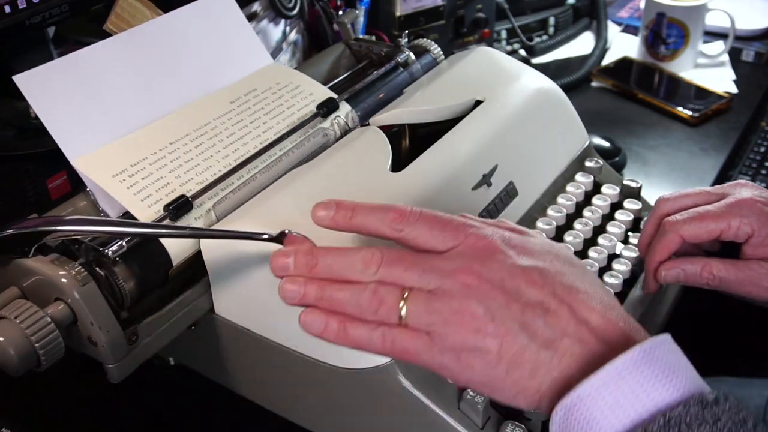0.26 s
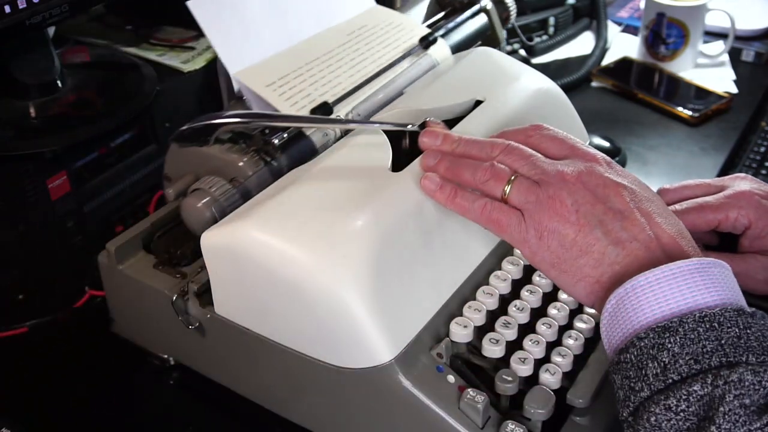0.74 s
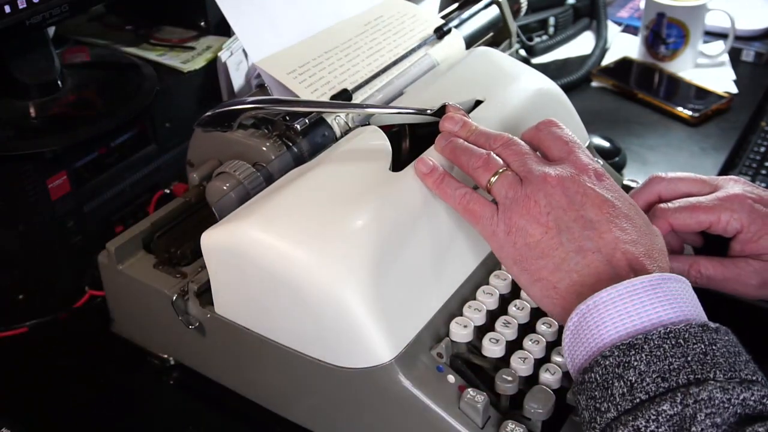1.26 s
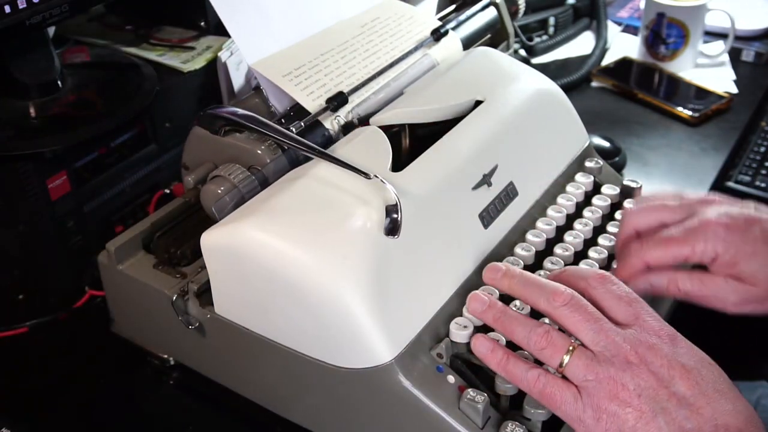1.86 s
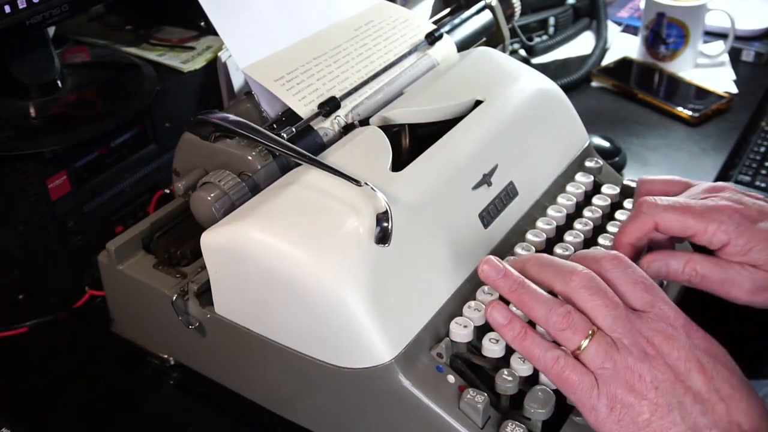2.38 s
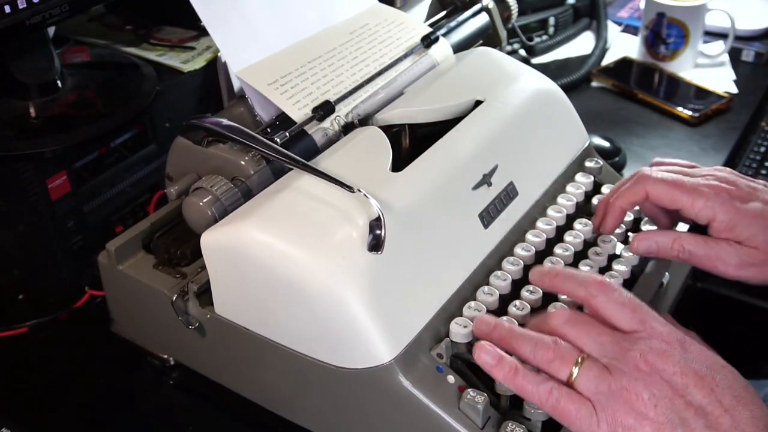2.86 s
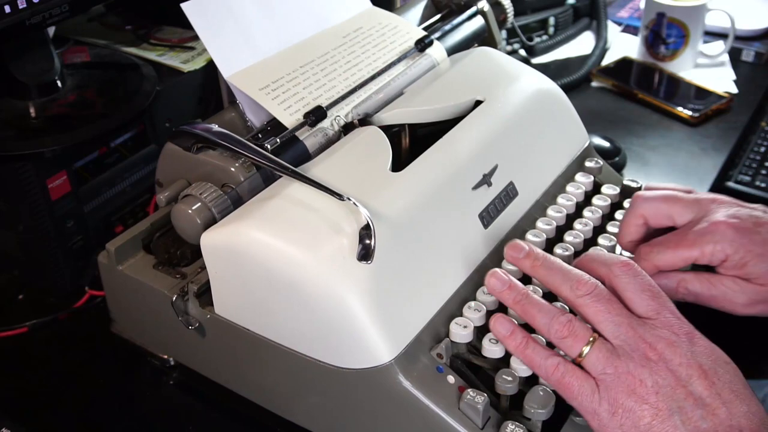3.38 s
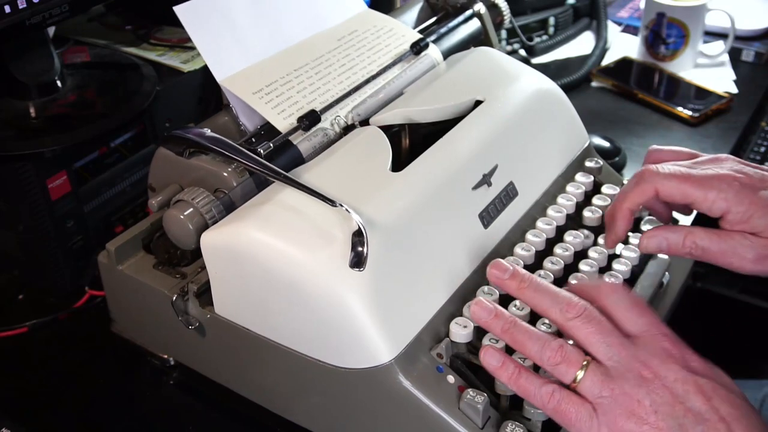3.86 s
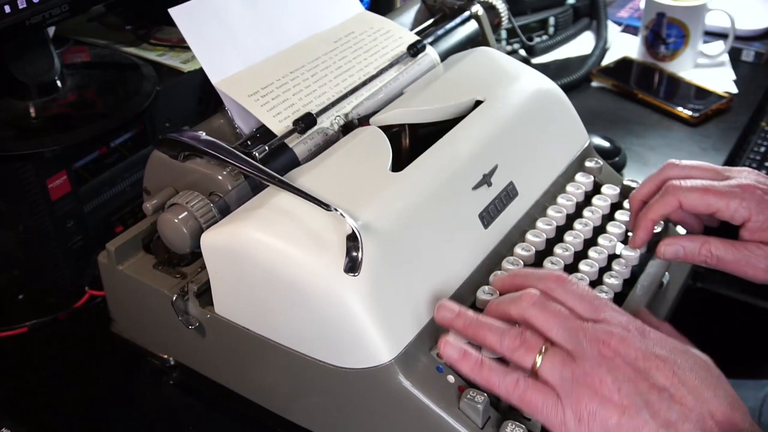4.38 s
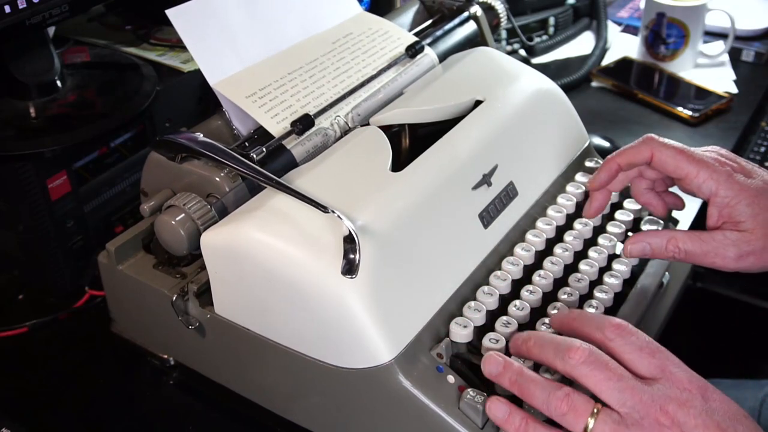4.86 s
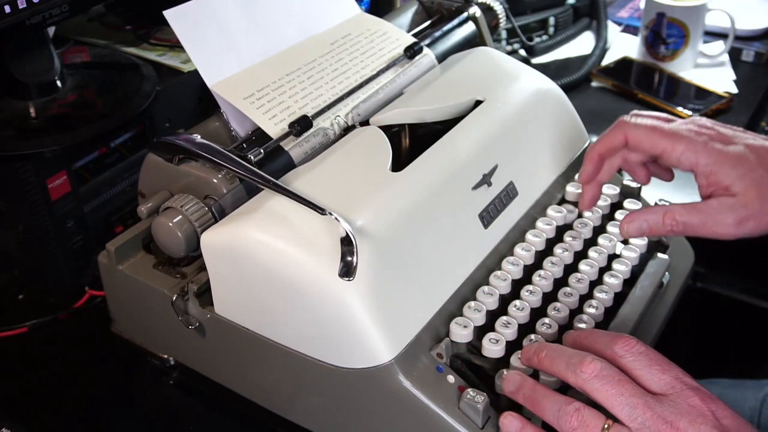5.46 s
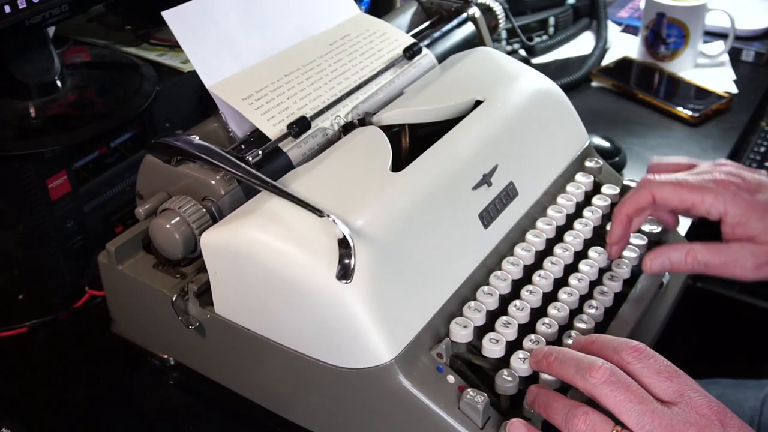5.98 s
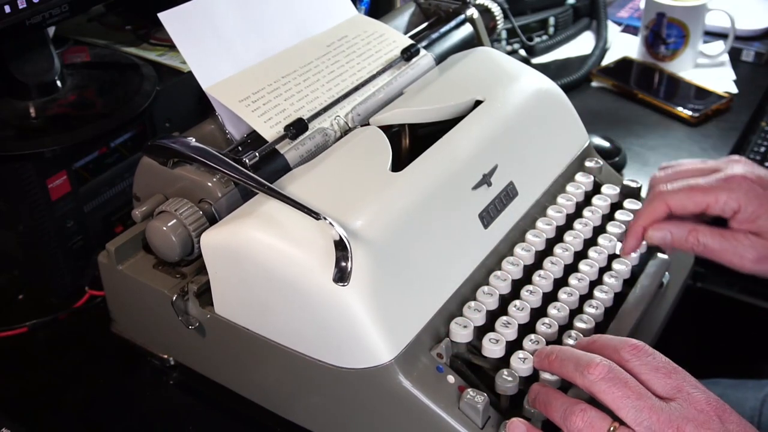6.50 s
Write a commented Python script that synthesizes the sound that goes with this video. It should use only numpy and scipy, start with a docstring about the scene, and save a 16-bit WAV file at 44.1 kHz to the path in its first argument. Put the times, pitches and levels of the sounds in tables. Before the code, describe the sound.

Close, sharp metallic keystrokes and space bar clacks on a manual typewriter follow a rattling carriage return in a small room.

```python
"""Typing on a manual typewriter

Close by in a small room, the carriage is pushed back, then a line is typed. Each letter is a chain of
metal contacts: the key goes down, the escapement (the catch that steps the carriage) trips, the slug
(the metal letter) cracks on the platen (the roller) and its typebar drops back. The blows rattle the
basket of typebars, fingers thump the desk, and a faint hum lies underneath."""
import sys
import numpy as np
from scipy import signal
from scipy.fft import rfft, irfft, next_fast_len
from scipy.io import wavfile

SR = 44100
rng = np.random.default_rng(int(sys.argv[2]) if len(sys.argv) > 2 else 0)


def to_wav(s):
    """Save 16-bit WAV."""
    ch = np.atleast_2d(s).T  # columns
    pcm = np.round(np.clip(ch, -1, 1) * 32767)  # PCM
    wavfile.write(sys.argv[1], SR, pcm.astype(np.int16))


N = 296793
TIME = np.arange(N) / SR

# Levels in the tables are relative. A ring time (t60) is how long a sound takes to fade by 60 dB.
# typed letters: (strike time [s], crack [dB], key travel before it [s], finger push [dB], way back [s])
KEYSTROKES = [(1.5884, -15.5, .041, -27.5, 0.057), (1.815, -13.5, .037, -23, 0.05),
              (2.0854, -12, 0.037, -20.5, 0.059), (2.226, -12.5, 0.043, -32, 0.052),
              (2.4182, -13.5, 0.044, -24.5, 0.053), (2.6865, -13.5, 0.04, -26, 0.044),
              (2.7983, -13.5, 0.012, -47, 0.045), (2.9521, -13, 0.028, -30.5, 0.051),
              (3.064, -15, .014, -35, 0.046), (3.2653, -14, .037, -25.5, 0.056),
              (3.396, -13.5, 0.019, -33, 0.051), (3.6842, -14, .041, -22.5, .051),
              (3.8474, -13.5, .028, -26, 0.046), (4.311, -14, 0.03, -31, 0.048),
              (5.297, -18.5, .031, -33, 0.057), (5.8768, -17.5, .036, -25.5, .052),
              (6.1276, -15, 0.033, -30, 0.05)]
# the space bar or a released key unlatches, then lands: (time [s], latch [dB], landing [dB])
KEY_CLACKS = [(1.741, -32, -39), (1.941, -31, -40.5), (1.965, -36, -33), (2.508, -52, -31),
              (2.54, -30, -33), (2.619, -33, -29.5), (3.205, -31.5, -42), (3.468, -33, -32.5),
              (3.543, -29, -30), (3.98, -32, -30.5), (3.996, -29.5, -36.5), (4.091, -45, -28.5),
              (4.112, -36.5, -46), (4.27, -37.5, -46.5), (4.47, -32.5, -35.5), (4.522, -60, -41.5),
              (5.424, -33.5, -40), (6.016, -30.5, -35.5), (6.258, -31.5, -37.5)]
# fingertips touch the keys: (time [s], level [dB])
FINGER_TOUCHES = [(4.64, -66), (5.584, -63), (5.644, -56.5), (5.741, -61.5), (5.762, -58.5), (6.471, -51.5),
                  (6.486, -65), (6.637, -67.5)]
# return lever, ratchet and margin stop; more weight, more knock: (time [s], level [dB], weight [dB])
LEVER_HITS = [(.009, -40.5, 3), (0.054, -36, -3), (0.09, -31.5, -4), (.102, -27.5, -4), (.126, -29.5, -3),
              (.139, -26.5, -16), (.151, -26, -3.5), (.182, -31.5, -4.5), (.274, -31, -2),
              (0.3187, -25.5, -13), (0.898, -44, 2.5), (.991, -42.5, -1.5), (1.082, -30.5, 4.5),
              (1.117, -40.5, 0.5), (1.224, -44.5, 3.5), (1.261, -32, 6.5), (1.272, -22.5, 0),
              (1.29, -27.5, -0.5), (1.304, -33.5, -8), (1.371, -34.5, -0.5), (1.403, -38.5, -5)]
# a hand shoves the machine into the desk: (time [s], level [dB])
HAND_SHOVES = [(.164, -45.5), (1.106, -45), (1.151, -41.5), (1.29, -46), (4.159, -41)]

# the tone colour of each sound: (frequency [Hz], level [dB])
KNOCK_COLOUR = [(100, -7.5), (190, -6.5), (300, -2), (440, 0.5), (560, -4), (900, -1.5), (1500, 0),
                (1900, 3), (2800, -19), (6000, -44.5)]  # heavy frame
CLICK_COLOUR = [(600, -42), (1400, -18.5), (2300, 6.5), (3300, 1.5), (4800, 3), (5800, 2), (6600, -3),
                (8000, -6), (11000, -19.5)]  # levers
TICK_COLOUR = [(4000, -52), (7000, -3), (8500, -2.5), (10000, -2), (11000, -5.5), (15500, -3.5)]  # smallest parts
CRACK_COLOUR = [(300, -46), (1200, -7.5), (2200, 8), (3200, 1.5), (4800, 6), (6500, 2), (8000, 1.5),
                (10000, -5.5), (14000, -18.5)]  # slug on the roller
CHATTER_COLOUR = [(300,-18.5), (1000,-12.5), (1600,1.5), (2300,1.5), (3400,5.5), (4700,4), (5700,5),
                  (6500,-2.5), (8500,-0.5), (11000,-13), (15500,-33)]  # neighbouring typebars
BASKET_COLOUR = [(100, -8), (400, 6), (900, 4.5), (1500, -10.5), (2400, 5.5), (3500, -0.5), (5500, 2.5),
                 (7000, 0.5), (10000, 2.5), (15000, 2.5)]  # the whole basket rattling
RAIL_COLOUR = [(60,-2), (120,8.5), (160,-3), (200,-3.5), (450,5), (530,-0.5), (700,-0.5), (1050,-7.5),
               (1400,3.5), (1650,-1), (1950,4.5), (2550,-6), (3200,-10.5), (6000,-10), (12000,-51)]  # carriage on its rail
PAWL_COLOUR = [(1500, -18), (3000, -4), (4500, 7), (6300, -2), (7500, -5), (11000, -6), (15000, -6)]  # small catch skipping over teeth
SWAY_COLOUR = [(12, -12), (25, -5), (38, -6.5), (55, -6), (80, -5), (200, -45)]  # swaying desk
RUB_COLOUR = [(700, -32), (1400, 1.5), (1680, 4), (2150, -3), (2420, 4), (3200, -6), (3760, -4),
              (5500, -15), (12000, -33)]  # faint rubbing
ROOM_COLOUR = [(25,-32), (45,-20), (62,-10.5), (85,-9.5), (120,-12.5), (200,-14), (450,-25), (700,-25.5),
               (1100,-41.5), (2400,-31), (4000,-45), (8000,-54), (15000,-47.5)]  # room noise

# the tones that parts ring with: (frequency [Hz], level [dB], ring time [s])
PLATEN_TONES = [(2227, -9.5, 0.07), (3610, -14, .02), (4870, -28, .018), (4730, 9.5, 0.078),
                (5060, -0.5, 0.045), (5700, 5, .02), (7000, -10, .012), (8530, -10, .012),
                (9950, -16.5, .014)]  # slug and roller
FRAME_TONES = [(403,0,.16), (455,0,.14), (700,0,.15), (1125,-3,.15), (1410,-3,.15), (2223,-2,.22),
               (2345,-2,.2), (2458,-4,.22), (3208,-9,.17), (4463,-10,.16), (4796,-10,.16), (5647,-9,.18)]  # cover panels, springs and bars
RATCHET_TONES = [(1850, -4, .025), (2280, -1, .035), (2470, 0, .04), (2610, -3, .03), (4700, -8, .025)]  # return lever and ratchet
SPRING_TONES = [(2258, -12.5, 1), (2430, 5, 0.39), (5025, -1, .7), (6196, -7.5, 0.65), (7623, 4, .6)]  # the spring that pulls the carriage
# hum in the room: (frequency [Hz], level [dB])
HUM_TONES = [(99.8, -54.5), (103.5, -62), (140, -66), (204.6, -76), (301.5, -73.5)]

# stereo curves, which scene() scales: (frequency [Hz], level [dB])
STEREO_WIDTH = [(60, -29), (150, -19.5), (350, -19), (700, -10), (1400, -7), (2800, -5.5), (5500, -2.5),
                (11000, -0.8)]  # side (what differs between the ears) against mid (what they share)
STEREO_BALANCE = [(120, 0), (500, -.7), (1000, -1.4), (2000, -1.4), (4000, -1), (8000, 0.7), (12000, 0.5)]  # left against right

LANDING_S = .012  # from a key's latch to its landing
PUSH_PEAK_S, PUSH_WIDTH_S = .48, .185  # when the carriage is fastest; how long its speed swells


def typebars(trip_offset_db=-13):
    """A bar scrapes into its guide, trips the escapement, hits the roller and shakes its neighbours."""
    s, crack_db, *_ = np.transpose(KEYSTROKES)
    trip_db = crack_db + trip_offset_db
    scrape = contacts(s - .01, trip_db - 8.5, rise=.1, t60=.03, rough_db=-4)
    trip = contacts(s - .0052, trip_db + 2.5, rise=.02, t60=.019, rough_db=3)
    approach = scrape + trip
    escapement = (colour(approach, CLICK_COLOUR) + undb(-8) * colour(approach, KNOCK_COLOUR)
                  + colour(approach, TICK_COLOUR))
    slug = colour(contacts(s + .0008, crack_db + .5, rise=.003, t60=.021, rough_db=-2.5), CRACK_COLOUR)
    edge = colour(contacts(s + .00027, crack_db - 3, rise=.003, t60=.007, rough_db=3), TICK_COLOUR)
    neighbours = contacts(s + .012, crack_db - 17.5, rise=.061, t60=.41, rough_db=2.5)
    chatter = colour(neighbours, CHATTER_COLOUR)
    platen = np.zeros((2, N))
    for when, db in zip(s, crack_db):  # every letter lands differently, so the tones vary in strength
        add(platen, when + .0004, undb(db + 12.5) * tones(PLATEN_TONES, size=2048, scatter_db=10.5))
    bars = clinks(s, crack_db + 3.5, low_hz=2390, high_hz=13870, t60=.14, db_per_octave=-6.5, count=14)
    return escapement + slug + edge + chatter + platen + bars


def keyboard():
    """Keys go down, typebars fall back, the space bar and released keys clack, and fingertips tap."""
    strike, crack_db, travel, push_db, way_back = np.transpose(KEYSTROKES)
    clack, latch_db, landing_db = np.transpose(KEY_CLACKS)
    touch, touch_db = np.transpose(FINGER_TOUCHES)
    fall_db = -30.5 + .6 * (crack_db - crack_db.mean())  # a harder strike bounces back harder
    presses = blows(strike - travel, push_db, rise=.0054, knock_t60=.094, click_t60=.083,
                    rough_db=4.5, knock_db=-8, click_db=-1.5, tick_db=-2)
    falls = blows(strike + way_back, fall_db, rise=.054, knock_t60=.13, click_t60=.11,
                  rough_db=3, knock_db=-2, click_db=1.5, tick_db=-6)
    latches = blows(clack, latch_db, rise=.019, knock_t60=.09, click_t60=.072,
                    rough_db=4.5, knock_db=-6, click_db=.8, tick_db=-1)
    landings = blows(clack + LANDING_S, landing_db, rise=.021, knock_t60=.085, click_t60=.06,
                     rough_db=3.5, knock_db=.1, click_db=-5, tick_db=-15)
    touches = blows(touch, touch_db, rise=.0065, knock_t60=.14, click_t60=.043,
                    rough_db=8.5, knock_db=-4.5, click_db=7, tick_db=2)
    key_levers = clinks(clack + LANDING_S, landing_db + 19.5, low_hz=483, high_hz=2880, t60=.11,
                        db_per_octave=4.5, count=7)
    return presses + falls + latches + landings + key_levers + touches


def carriage(tooth_hz=165, wheel_hz=27, bump_count=15):
    """A lever rolls the paper up; the carriage rumbles home as its pawl skips over a toothed wheel."""
    speed = carriage_speed(TIME)
    travel = np.cumsum(speed) / SR  # teeth and wheel reach the given rates at a speed of 1
    teeth_db = 4 * np.sin(2 * np.pi * tooth_hz * travel) + 3 * np.sin(2 * np.pi * wheel_hz * travel)
    rumble = colour(grit(N, rough_db=2.5) * speed * undb(-37.5 + teeth_db / 2), RAIL_COLOUR)
    pawl = colour(grit(N, rough_db=2) * undb(-56.5 + teeth_db * speed) * speed ** .3, PAWL_COLOUR)
    s, db, weight_db = np.transpose(LEVER_HITS)
    lever = blows(s, db, rise=.0088, knock_t60=.089, click_t60=.028,
                  rough_db=2.5, knock_db=-11.5, click_db=-2.5, tick_db=-11, weight_db=weight_db)
    uneven_steps = (np.arange(bump_count) + rng.random(bump_count)) / bump_count
    bump_s = PUSH_PEAK_S + 3 * PUSH_WIDTH_S * (uneven_steps - .5)
    bump_db = -34 + 13 * np.log10(carriage_speed(bump_s)) + rng.standard_normal(bump_count)
    bumps = colour(contacts(bump_s, bump_db, rise=.0051, t60=.017, rough_db=-.5), CLICK_COLOUR)
    spring = undb(-12.5) * ring(pawl, tones(SPRING_TONES))
    ratchet = ring(undb(-17) * (lever + pawl) + undb(-5.5) * bumps, tones(RATCHET_TONES))
    return rumble + pawl + lever + bumps + spring + ratchet


def carriage_speed(t, creep=.052, stop_s=1.3):
    """One push: the speed swells to about 1 and dies down, then the carriage creeps to the margin."""
    push = np.exp(-((t - PUSH_PEAK_S) / PUSH_WIDTH_S) ** 2)
    return (push + creep) * fade(t - stop_s, .05)


def basket(hits, t60=.26, level_db=-8):
    """Loose typebars and springs store each blow's energy, octave by octave, and rattle it out again."""
    t = TIME[:SR // 2]
    storage = unit(fade(t, t60) * (1 - fade(t, .031))) ** 2
    rattle = np.zeros((2, N))
    for low_hz in 250 * 2 ** np.arange(6):
        octave = signal.butter(2, [low_hz, 2 * low_hz], "bandpass", fs=SR, output="sos")
        energy = np.maximum(ring(signal.sosfilt(octave, hits[0]) ** 2, storage), 0)
        rattle += np.sqrt(N * energy) * unit(signal.sosfilt(octave, rng.standard_normal((2, N))))
    return undb(level_db) * colour(rattle, BASKET_COLOUR)


def resonance(hits, cover_t60=.036, room_t60=.94):
    """Each blow rattles the basket, rings the frame and echoes under the cover and around the room."""
    t = TIME[:SR]
    cover = unit(rng.standard_normal((2, SR)) * fade(t, cover_t60) * (1 - fade(t, .0064)))
    room = unit(rng.standard_normal((2, SR)) * fade(t, room_t60) * (1 - fade(t, .081)))
    walls = colour(room, [(100, 12), (2500, -8), (7000, -10.5), (15000, -19.5)])
    echoes = undb(-12) * cover + undb(-21) * walls
    return basket(hits) + ring(hits[0], echoes + undb(-19) * tones(FRAME_TONES))


def desk_thumps(low_hz=73, upper_hz=112, pitch_spread=.088, rise=.13, t60=.066):
    """The heavy machine bounces on its feet and bends the desk top, at a new pitch each time."""
    keys_down = [(s - .0189, -41.5) for s, *_ in KEYSTROKES]
    fingers_up = [(s + .082, -48) for s, *_ in KEYSTROKES]
    landings = [(s + LANDING_S, db - 9) for s, _, db in KEY_CLACKS]
    track, lead_s = np.zeros((1, N)), .06
    t = TIME[:SR // 2] - lead_s
    shape = fade(-t - .005, rise) * fade(t - .005, t60)
    for s, db in keys_down + fingers_up + landings + list(HAND_SHOVES):
        detune, offset = rng.standard_normal(2)
        phase = 2 * np.pi * (np.exp(pitch_spread * detune) * t + offset)
        bounce = np.sin(low_hz * phase) + undb(-5) * np.sin(upper_hz * phase)
        add(track, s - lead_s, (undb(db + 6) * bounce * shape)[None])
    return track * np.array([[1], [0]])  # mid only


def desk_sway(peak_s=4.16, rise=.097, t60=1.84):
    """One hard hit on the space bar sets the desk swaying with a deep rumble."""
    since = TIME - peak_s
    shake = rng.standard_normal((2, N)) * fade(-since, rise) * fade(since, t60)
    return undb(-42.5) * colour(shake, SWAY_COLOUR, size=16384)


def rubbing(from_s=5.7, rise=.2, level_db=-67):
    """Something rubs faintly in the machine, from the last letters to the end."""
    return colour(grit(N, rough_db=.5) * fade(from_s - TIME, rise), RUB_COLOUR) * undb(level_db)


def background(air_db=-61):
    """Low room noise, and a hum that wavers because two of its tones lie close together."""
    air = colour(rng.standard_normal((2, N)), ROOM_COLOUR) * undb(air_db)
    for hz, db in HUM_TONES:
        air[0] += np.sqrt(2) * undb(db) * np.sin(2 * np.pi * (hz * TIME + rng.random()))
    return air


def blows(s, db, rise, knock_t60, click_t60, rough_db, knock_db, click_db, tick_db, weight_db=0):
    """Each blow knocks the frame, clicks the levers and ticks the smallest parts."""
    knock = colour(contacts(s, db + knock_db + weight_db, rise, knock_t60, rough_db), KNOCK_COLOUR)
    click = colour(contacts(s, db + click_db, rise, click_t60, rough_db), CLICK_COLOUR)
    tick = colour(contacts(s, db + tick_db - weight_db, rise, click_t60, rough_db), TICK_COLOUR)
    return knock + click + tick


def contacts(times, levels_db, rise, t60, rough_db):
    """Loose parts meet: tiny impacts build up to each given time, then chatter away."""
    track, lead_s = np.zeros((2, N)), .03
    t = TIME[:SR // 2] - lead_s
    shape = fade(-t, rise) * fade(t, t60)  # rise is a ring time run backwards
    for s, db in zip(times, levels_db):
        add(track, s - lead_s, undb(db) * np.linalg.norm(shape) * unit(shape * grit(len(t), rough_db)))
    return track


def grit(length, rough_db, size=24):
    """Mid and side noise made of tiny impacts of uneven strength, each about half a millisecond long."""
    strength = undb(rough_db * np.clip(rng.standard_normal(length // size + 1), -2, 2))
    strength /= np.sqrt(np.mean(strength ** 2))
    return rng.standard_normal((2, length)) * np.repeat(strength, size)[:length]


def clinks(times, levels_db, low_hz, high_hz, t60, db_per_octave, count):
    """No two parts have the same shape, so each hit rings with its own random tones."""
    track = np.zeros((2, N))
    for s, db, spots in zip(times, levels_db, rng.random((len(times), count))):
        pitches = low_hz * (high_hz / low_hz) ** spots
        table = [(hz, db_per_octave * np.log2(hz / low_hz), t60) for hz in pitches]
        add(track, s, undb(db) * tones(table, size=6000, scatter_db=4))
    return track


def tones(table, size=SR, scatter_db=0):
    """A struck part rings as fading sine waves, each shifted at random in the side channel."""
    t = TIME[:size]
    sound = np.zeros((2, size))
    for hz, db, t60 in table:
        strength = undb(db + scatter_db * rng.standard_normal())
        offset = np.array([[0], [rng.random()]])
        sound += strength * fade(t, t60) * np.sin(2 * np.pi * (hz * t + offset))
    return unit(sound)


def colour(x, points, size=4096):
    """Give a sound a tone colour; white noise keeps its level."""
    # folding the cepstrum makes a filter that rings only after a hit, never before it
    cepstrum = irfft(np.log(gains(points, size)))
    cepstrum[1:size // 2] *= 2
    cepstrum[size // 2 + 1:] = 0
    return ring(x, unit(irfft(np.exp(rfft(cepstrum)))))


def equalise(x, points, amount):
    """Turn frequencies up or down by a curve's decibels times amount, with no delay."""
    size = next_fast_len(N)
    return irfft(rfft(x, size) * gains(points, size) ** amount, size)[:N]


def gains(points, size):
    """Turn a (frequency [Hz], level [dB]) curve into one gain for each frequency step."""
    hz, db = np.transpose(points)
    step_hz = np.arange(size // 2 + 1) * SR / size
    return undb(np.interp(np.log(step_hz + 1), np.log(hz), db))


def ring(x, response):
    """Let every sample of a sound set off a copy of the response (convolution)."""
    return signal.oaconvolve(np.atleast_2d(x), np.atleast_2d(response), axes=-1)[:, :x.shape[-1]]


def add(track, s, sound):
    """Mix a sound into a track, starting at s seconds."""
    start = int(s * SR)
    lo, hi = max(start, 0), min(start + sound.shape[-1], N)
    track[:, lo:hi] += sound[:, lo - start:hi - start]


def fade(t, t60):
    """Stay at 1 until t = 0, then fall by 60 dB every t60 seconds."""
    return np.exp(-np.log(1000) * np.maximum(t, 0) / t60)


def unit(x):
    """Scale each channel to an energy of 1."""
    return x / np.sqrt(np.sum(x ** 2, axis=-1, keepdims=True))


def undb(db):
    """Turn decibels into a gain."""
    return 10 ** (np.asarray(db) / 20)


def scene():
    """Mix all the parts into left and right, with the bass in the middle and the treble wide."""
    typing, sliding = typebars() + keyboard(), carriage()
    ringing = resonance(typing + undb(.5) * sliding)
    mid, side = typing + sliding + ringing + desk_thumps() + desk_sway() + rubbing() + background()
    side = equalise(side, STEREO_WIDTH, amount=.96)
    left = equalise(mid + side, STEREO_BALANCE, amount=.45)
    right = equalise(mid - side, STEREO_BALANCE, amount=-.63)
    return undb(-1.53) * np.array([left, right])


def record(dry):
    """Round off the sharpest peaks and cut the highest treble."""
    ceiling, top_hz = .7, 15900
    rounded = ceiling * np.tanh(dry / ceiling)
    return signal.sosfilt(signal.ellip(10, .1, 75, top_hz, fs=SR, output="sos"), rounded)


dry = scene()
out = record(dry)
to_wav(out)
```